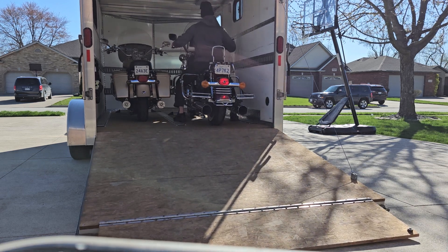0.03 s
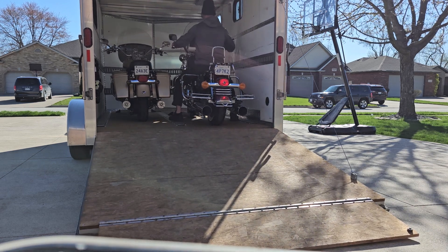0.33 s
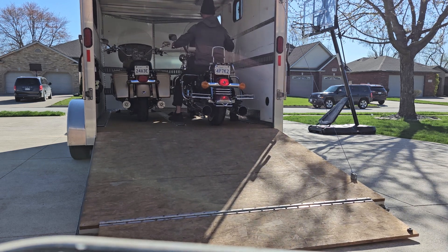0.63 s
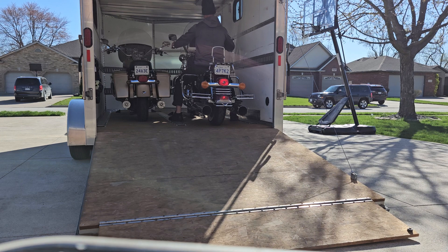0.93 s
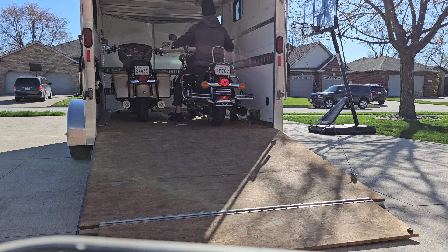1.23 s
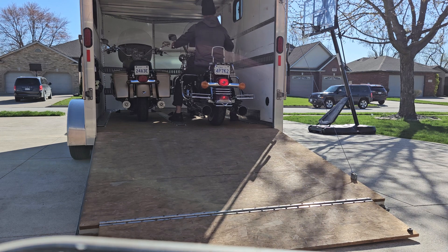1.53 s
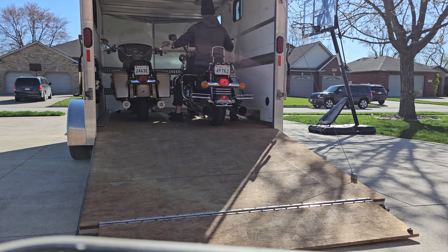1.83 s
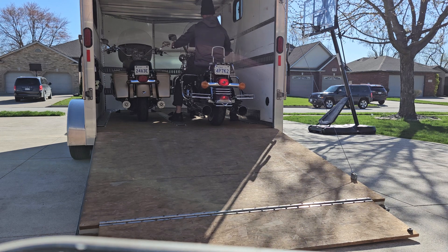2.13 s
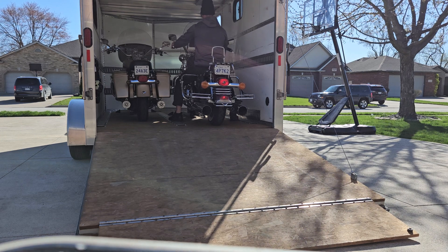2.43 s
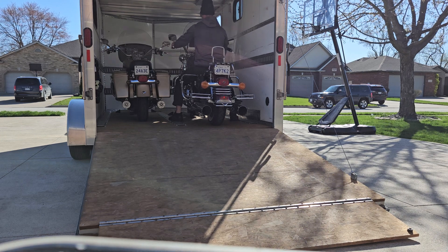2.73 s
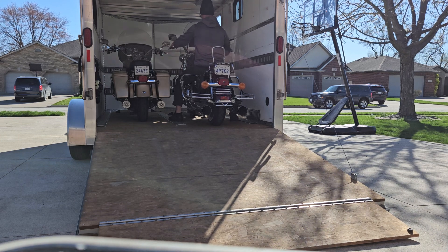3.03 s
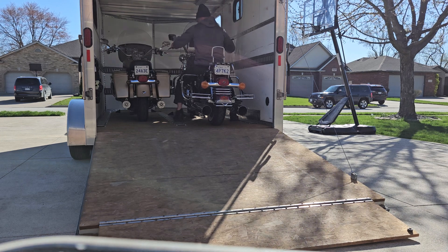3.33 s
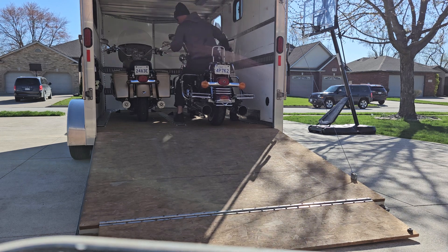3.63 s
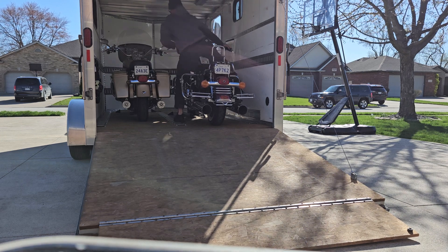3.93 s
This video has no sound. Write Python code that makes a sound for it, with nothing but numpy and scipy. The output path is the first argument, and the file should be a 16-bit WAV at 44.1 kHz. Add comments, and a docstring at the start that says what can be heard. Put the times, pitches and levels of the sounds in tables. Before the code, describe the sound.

A motorcycle engine thumps at idle, cuts out and slows to a stop, leaving quiet.

```python
"""A V-twin motorcycle idles in an open box trailer, heard from the foot of the ramp. Uneven firings
thump, crack in the exhaust and set the trailer booming. After 1.2 s firing stops: the pistons pump
ever slower, valves hiss, the drive swishes. Near 2.5 s the crank rocks back with a last gear whirr.
Then the settling metal ticks; a quiet street and a far bird remain."""
import sys
import numpy as np
from scipy import signal
from scipy.fft import rfft, irfft
from scipy.io import wavfile

SR = 44100
rng = np.random.default_rng(int(sys.argv[2]) if len(sys.argv) > 2 else 0)


def generate_wav(signal):
    """Clip the signal to [-1, 1] and save it as 16-bit WAV at the path in sys.argv[1]."""
    frames = np.transpose(np.atleast_2d(signal))
    scaled = np.clip(frames, -1, 1) * 32767
    pcm = np.round(scaled).astype(np.int16)
    wavfile.write(sys.argv[1], SR, pcm)


N = 176400
TIME_S = np.arange(N) / SR
FREQS_HZ = np.maximum(np.fft.rfftfreq(N, 1 / SR), 1)

# firings: start_s, thump_db, softness_ms, crack_db
FIRINGS = [(0.0125, 0.2, 0.73, -21), (0.0548, -2.4, 0.87, -30), (0.0964, -2.7, 0.74, -26),
           (0.1326, -2, 0.89, -25.5), (0.1786, -1.5, 0.65, -21), (0.2208, -3.5, 1.05, -29),
           (0.2621, -1.7, 0.69, -21), (0.308, -6, 0.92, -31.5), (0.3497, -1.5, 0.88, -26.5),
           (0.3864, -1, 0.96, -23.5), (0.4324, -0.9, 0.63, -21), (0.4755, -2.5, 1.2, -32.5),
           (0.5156, -1.4, 0.65, -25.5), (0.5516, -2, 0.83, -22.5), (0.5976, -1.7, 0.7, -23.5),
           (0.6404, -4, 1.1, -32.5), (0.6806, 0.5, 0.66, -23.5), (0.7171, -2.1, 0.89, -23.5),
           (0.7634, -2.8, 0.8, -25), (0.8058, -4.5, 0.82, -35.5), (0.8454, -1.3, 0.61, -23),
           (0.8816, -1.5, 0.87, -23), (0.9284, -0.4, 0.72, -18.5), (0.9711, -4.5, 1.13, -28),
           (1.0132, -4, 0.69, -26.5), (1.0495, 0.5, 0.77, -20.5), (1.097, -4.7, 0.61, -22),
           (1.1386, -3.9, 0.84, -33), (1.1804, -2.7, 0.88, -27.5), (1.2154, -2.5, 0.86, -29)]
# exhaust resonances and trailer standing waves: pitch_hz, width_hz, signed_gain
BOOM_MODES = [(120.1, 37.6, -0.36), (126, 140, 0.132), (63.06, 4.6, 0.76), (81.4, 9.8, 0.23),
              (88.8, 6.1, 0.18), (118.9, 11.64, 0.74), (135.5, 5.2, 0.11), (191.8, 3.6, 0.095),
              (224.59, 9.9, -0.18), (255.8, 6.4, 0.17), (293, 7.0, -0.18), (352.7, 22.96, 0.094),
              (417.76, 5.8, 0.66)]
# thump reflections: delay_ms, signed_gain
THUMP_ECHOES = [(5.67, 0.26), (12.54, 0.56), (18.41, -0.23), (47.86, -0.35), (63.66, 0.25)]
# turbulent gas: freq_hz, level_db
GAS_SPECTRUM = [(60, -12.5), (130, 5), (260, -1), (420, -4.5), (520, -17.5), (620, -16.5), (740, -7.5),
                (850, -21), (1200, -17), (1700, -31), (3000, -37.5)]
# exhaust crack: freq_hz, level_db
CRACK_SPECTRUM = [(880, -31), (1500, 0.5), (1790, -23.5), (1980, -10.5), (2660, -14), (3250, -8),
                  (3840, -3), (4370, -1.5), (4970, -1), (5440, 0.5), (6180, -7), (6690, -12), (7320, -5.5),
                  (8240, -7), (9650, -12), (11300, -8), (12700, -3.5), (15100, -7.5), (16000, -34.5)]
# tailpipe rim: pitch_hz, width_hz, level_db
RIM_MODES = [(3905, 183, -3.5), (5430, 212, -6), (8140, 300, -2.5)]
# wall reflections: delay_s, level_db
WALL_ECHOES = [(.0078, -11.5), (0.0105, -14.5), (0.018, -25.5)]
# drive swish, surging with each slow turn: time_s, level_db
SWISH_ENVELOPE = [(0, -42), (1.25, -44.5), (1.55, -46), (1.78, -47.5), (1.825, -44.5), (1.87, -51.5),
                  (1.91, -46), (1.97, -49.5), (2.03, -45), (2.11, -57), (2.155, -45), (2.21, -48),
                  (2.335, -71), (2.37, -52), (2.41, -53.5), (2.46, -58), (2.54, -44), (2.58, -51),
                  (2.68, -69), (2.85, -78), (3.1, -110)]
# drive swish: freq_hz, level_db
SWISH_SPECTRUM = [(530, -39.5), (900, -11), (1020, -1), (1220, -6), (1790, -7.5), (2270, -5), (2540, -9.5),
                  (2790, -3), (3150, -8), (3340, -5), (3640, -2), (4800, -0.5), (5220, -4.5), (5680, -4.5),
                  (5960, -12.5), (7490, 1), (8150, -9.5), (8870, -7), (10100, -26.5), (12900, -16.5),
                  (16000, -35.5)]
# metal casing: pitch_hz, width_hz, level_db
CASING_MODES = [(423, 25, 6.5), (2230, 35, -2.5), (2374, 39, -0.5), (2846, 70, -4), (4370, 71, -6.5),
                (4712, 60, 0.5), (5000, 77, -3.5), (5570, 60, -3.5), (7190, 140, -4.5), (7640, 110, -5)]
# street rumble: freq_hz, level_db
STREET_SPECTRUM = [(15, -35.5), (25, -6.5), (48, -3.5), (74, -5), (126, -9.5), (278, -20), (344, -23.5),
                   (584, -24.5), (632, -28.5), (722, -24.5), (2500, -38), (4850, -49.5), (7610, -66.5),
                   (9410, -79), (14000, -70)]
# unfired strokes: start_s, puff_db, hiss_db
STROKES = [(1.265, 5, -40), (1.3021, 2.5, -36.5), (1.3517, 6, -32.5), (1.3901, 0, -34.5),
           (1.4476, -4, -33.5), (1.4895, 4, -37.5), (1.5542, -2, -38), (1.6035, 1.5, -40.5),
           (1.6774, -0.3, -40), (1.7359, 1.5, -42), (1.8283, 1.8, -46), (1.9021, -1.3, -44.5),
           (2.0258, -4.5, -49), (2.144, -5.5, -50), (2.3123, -22.5, -85), (2.5059, -19.5, -51.5)]
# puff swinging back in the pipe: delay_ms, gain
REBOUNDS = [(9.19, 0.2), (34.5, 0.66)]
# pipe air column: pitch_hz, width_hz, signed_gain
PIPE_MODES = [(46.25, 7.5, -1.22), (65, 4.2, -1.64), (72, 5.8, -0.92), (76.8, 18, 0.83), (96.04, 6, -1.12),
              (124.8, 9.3, -0.32), (125.27, 6.5, -0.916), (134.4, 3.5, 1.24)]
# unburnt air: time_s, level_db
AIR_ENVELOPE = [(1.15, -53), (1.28, -26.5), (1.42, -30), (1.6, -33), (1.9, -38), (2.05, -42.5), (2.22, -49),
                (2.33, -57.5), (2.45, -53), (2.51, -54), (2.6, -76.5), (2.8, -90.5)]
# unburnt air: freq_hz, level_db
AIR_SPECTRUM = [(70, -18), (110, -1), (138, 2.5), (175, -6), (240, -5), (340, -14.5), (410, -8),
                (520, -22.5), (740, -21.5), (1200, -26.5), (1800, -34.5), (3000, -51)]
# valve hiss: freq_hz, level_db
VALVE_SPECTRUM = [(500, -25), (2500, -14), (4500, 7), (6500, -4.5), (8000, -1), (10000, -7), (13000, -3),
                  (16000, -11.5)]
# gear whirr: time_s, level_db
WHIRR_ENVELOPE = [(1.5, -56), (2.3, -62), (2.39, -54), (2.46, -53), (2.52, -45.5), (2.57, -43.5),
                  (2.64, -54.5), (2.8, -71.5), (3, -95)]
# gear resonances: pitch_hz, width_hz, level_db
GEAR_MODES = [(422, 57, 1.5), (494, 78, 2.5), (611, 46, -0.5), (1008, 17.5, 1), (1955, 60, -10.5),
              (2197, 180, -8), (2750, 93, -22), (3940, 230, -19.5), (4750, 170, -20)]
# metal ticks: start_s, level_db
TICKS = [(2.73, -60), (2.935, -65.5), (3.13, -70), (3.593, -70.5)]
# metal ticks: freq_hz, level_db
TICK_SPECTRUM = [(300, -7), (2000, -7), (5000, -2), (8000, -5), (10000, -16), (15000, -14)]
# bird chirps: start_s, length_s, start_hz, end_hz, level_db
CHIRPS = [(3.005, 0.094, 4330, 4800, -68), (3.35, 0.052, 4700, 3900, -72), (3.761, 0.058, 4400, 5000, -68),
          (3.878, 0.061, 5300, 5100, -74.5), (3.948, 0.066, 4700, 3800, -66.5)]
# left-right likeness of the bike's noises: freq_hz, correlation
BIKE_CORRELATION = [(60, 0.81), (250, 0.99), (500, 0.82), (1000, 0.62), (2000, 0.22), (4000, 0.043),
                    (12000, -0.061)]
# left-right likeness of the street: freq_hz, correlation
STREET_CORRELATION = [(60, 0.99), (250, 0.95), (700, 0), (2000, 0.4), (8000, 0)]
# stereo tilt of the noises: freq_hz, left_minus_right_db
BALANCE = [(250, 0.2), (700, 1), (2400, -.5), (4400, -2), (6000, -2), (8000, 5), (14000, 5.5)]


def from_db(db):
    """Decibels to gain."""
    return 10 ** (np.asarray(db) / 20)


def unit_rms(x):
    """Scale to unit power."""
    return x / np.sqrt(np.mean(x ** 2) + 1e-20)


def over_time(points):
    """Breakpoints to a value per sample."""
    return np.interp(TIME_S, *np.transpose(points))


def over_hz(points):
    """Breakpoints to a value per bin, on a log axis."""
    hz, value = np.transpose(points)
    return np.interp(np.log(FREQS_HZ), np.log(hz), value)


def drift(rate_hz):
    """Smooth random curve, unit RMS."""
    return unit_rms(irfft(rfft(rng.standard_normal(N)) / (1 + (FREQS_HZ / rate_hz) ** 4), N))


def noise(spectrum, correlation=BIKE_CORRELATION):
    """Coloured stereo noise: narrow bass, wide treble."""
    mid, side = rfft(rng.standard_normal((2, N)))
    alike = np.clip(over_hz(correlation), -1, 1)
    sign = np.array([[1], [-1]])
    pair = np.sqrt(1 + alike) * mid + sign * np.sqrt(1 - alike) * side
    return unit_rms(irfft(pair * from_db(over_hz(spectrum) + sign * over_hz(BALANCE) / 2), N))


def resonate(x, hz, width_hz):
    """One resonance, unit peak gain."""
    r = np.exp(-np.pi * width_hz / SR)
    feedback = [1, -2 * r * np.cos(2 * np.pi * hz / SR), r * r]
    return signal.lfilter(np.array([1, 0, -1]) * (1 - r * r) / 2, feedback, x + 1e-18)


def delayed(x, delay_s):
    """Whole-sample delay."""
    lag = int(delay_s * SR)
    return np.concatenate([np.zeros_like(x[..., :lag]), x[..., :N - lag]], axis=-1)


def pressure_pulses(rows):
    """Gaussian pulses; level sets area, softness sets width."""
    out = np.zeros(N)
    for start_s, area_db, softness_ms in rows:
        width_s = softness_ms / 1000
        near = slice(max(int((start_s - 5 * width_s) * SR), 0), int((start_s + 5 * width_s) * SR))
        bell = np.exp(-.5 * ((TIME_S[near] - start_s) / width_s) ** 2)
        out[near] += from_db(area_db) * bell / (width_s * np.sqrt(2 * np.pi))
    return out


def bursts(start_s, level_db, rise_s, decay_s):
    """Envelope: fast rise and exponential decay per event."""
    kicks = np.zeros(N)
    kicks[np.clip((start_s * SR).astype(int), 0, N - 1)] = from_db(level_db)
    up, down = np.exp(-1 / (rise_s * SR)), np.exp(-1 / (decay_s * SR))
    return signal.lfilter([1 - up], [1, -up - down, up * down], kicks + 1e-18)


def boom(pulses, modes, echoes, low_cut_hz=46.5):
    """Pulses ring enclosed air and reflect."""
    direct = sum(gain * resonate(pulses, hz, width_hz) for hz, width_hz, gain in modes)
    reflected = sum(gain * delayed(direct, delay_ms / 1000) for delay_ms, gain in echoes)
    return signal.sosfilt(signal.butter(2, low_cut_hz, "high", fs=SR, output="sos"), direct + reflected)


def metal_ring(x, modes):
    """Metal modes, each two widened resonators in series; unit RMS."""
    return unit_rms(sum(from_db(db) * resonate(resonate(x, hz, 1.6 * width_hz), hz, 1.6 * width_hz)
                        for hz, width_hz, db in modes))


def thumps(gain_db=-39):
    """Each firing rings exhaust and trailer and bounces between the walls."""
    pulses = -pressure_pulses([row[:3] for row in FIRINGS])
    return from_db(gain_db) * boom(pulses, BOOM_MODES, THUMP_ECHOES)


def gas_rush(gain_db=-24):
    """Turbulent gas trails each firing."""
    start_s, thump_db, _, _ = np.transpose(FIRINGS)
    envelope = bursts(start_s, thump_db + gain_db, rise_s=0.00072, decay_s=0.039)
    return envelope * noise(GAS_SPECTRUM)


def cracks(gain_db=4.5, rim_db=7.5, scatter_db=2.5, lead_s=0.0022):
    """Each firing spits a crack that rings the tailpipe rim by a random amount."""
    start_s, _, _, crack_db = np.transpose(FIRINGS)
    jet = noise(CRACK_SPECTRUM)
    offsets_db = scatter_db * rng.standard_normal((len(FIRINGS), len(RIM_MODES)))

    def spit(level_db):
        return jet * bursts(start_s - lead_s, level_db + gain_db, rise_s=0.0011, decay_s=0.0015)

    rim = sum(resonate(spit(crack_db + mode_db + offset_db), hz, width_hz)
              for (hz, width_hz, mode_db), offset_db in zip(RIM_MODES, offsets_db.T))
    return spit(crack_db) + from_db(rim_db) * rim


def trailer_reverb(x, t60_s=0.23, predelay_s=0.005, tail_db=-12):
    """Direct sound, hard wall reflections, short diffuse tail."""
    time_s = TIME_S[:SR // 2]
    decay = from_db(-60 * time_s / t60_s) * (time_s > predelay_s)
    response = unit_rms(rng.standard_normal((2, len(time_s))) * decay) / np.sqrt(len(time_s))
    tail = signal.fftconvolve(x, response, axes=-1)[:, :N]
    walls = sum(from_db(db) * delayed(x, delay_s) for delay_s, db in WALL_ECHOES)
    return x + walls + from_db(tail_db) * tail


def drive_swish(tooth_noise, gain_db=-1.5, flutter_db=1.0, casing_db=-4.5):
    """Valve gear and chain swish with the crank and ring the casing."""
    surge = from_db(over_time(SWISH_ENVELOPE) + gain_db + flutter_db * drift(50))
    casing = from_db(casing_db) * metal_ring(tooth_noise, CASING_MODES)
    return surge * (noise(SWISH_SPECTRUM) + casing)


def street(level_db=-50.5, waver_db=0.13):
    """Low, near-steady outdoor rumble."""
    return from_db(level_db + waver_db * drift(11)) * noise(STREET_SPECTRUM, STREET_CORRELATION)


def run_down(gain_db=-48, softness_ms=1.74):
    """Unfired pistons push soft, rebounding puffs and a little air through the pipe."""
    pulses = pressure_pulses([(start_s, puff_db, softness_ms) for start_s, puff_db, _ in STROKES])
    air = from_db(over_time(AIR_ENVELOPE)) * noise(AIR_SPECTRUM)
    return from_db(gain_db) * boom(pulses, PIPE_MODES, REBOUNDS) + air


def valve_hiss(gain_db=1.5, lead_s=0.0039):
    """A valve opens and hisses just ahead of each puff."""
    start_s, _, hiss_db = np.transpose(STROKES)
    envelope = bursts(start_s - lead_s, hiss_db + gain_db, rise_s=0.0007, decay_s=0.0079)
    return envelope * noise(VALVE_SPECTRUM)


def gear_whirr(tooth_noise):
    """Gears ring, loudest as the crank rocks back."""
    return from_db(over_time(WHIRR_ENVELOPE)) * metal_ring(tooth_noise, GEAR_MODES)


def metal_ticks():
    """The resting bike ticks as its metal settles."""
    start_s, level_db = np.transpose(TICKS)
    return bursts(start_s, level_db, rise_s=0.0017, decay_s=0.019) * noise(TICK_SPECTRUM)


def bird(warble_rms_hz=350):
    """Far chirps: sine glides with a random warble per channel."""
    warble_hz = warble_rms_hz * np.array([drift(117.8), drift(123.5)])
    out = np.zeros((2, N))
    for start_s, length_s, start_hz, end_hz, level_db in CHIRPS:
        progress = np.clip((TIME_S - start_s) / length_s, 0, 1)
        pitch_hz = start_hz + (end_hz - start_hz) * progress + warble_hz
        phase = 2 * np.pi * np.cumsum(pitch_hz, axis=1) / SR
        out += from_db(level_db) * np.sin(np.pi * progress) * np.sin(phase)
    return out


def scene():
    """Bike in its trailer, street, bird."""
    exhaust = (thumps() + run_down()) * from_db([[.15], [-.15]]) + gas_rush()   # boom slightly left
    transients = trailer_reverb(cracks() + valve_hiss() + metal_ticks())
    tooth_noise = noise([(150, -21.5), (350, -11), (6000, 1), (9000, -4.5)])   # freq_hz, level_db
    return exhaust + transients + drive_swish(tooth_noise) + gear_whirr(tooth_noise) + street() + bird()


def record(dry, cutoff_hz=16300):
    """Steep low-pass."""
    return signal.sosfilt(signal.ellip(10, .1, 80, cutoff_hz, fs=SR, output="sos"), dry)


dry = scene()
out = record(dry)
generate_wav(out)
```